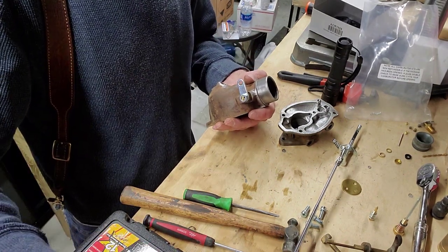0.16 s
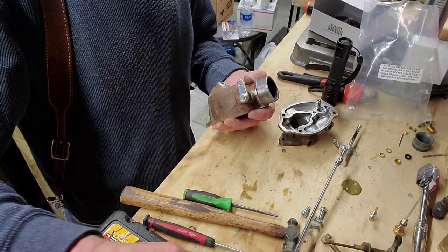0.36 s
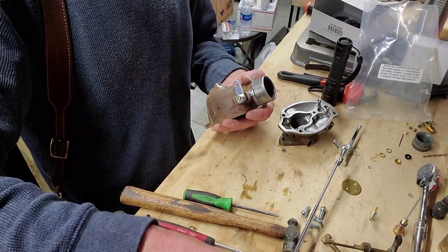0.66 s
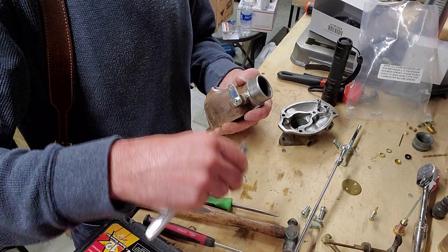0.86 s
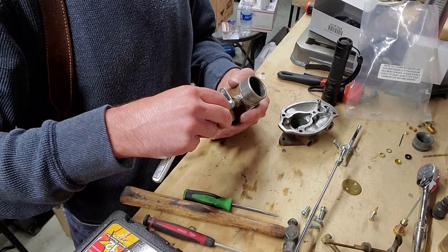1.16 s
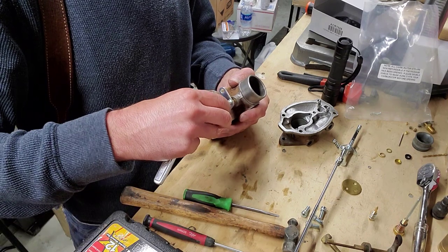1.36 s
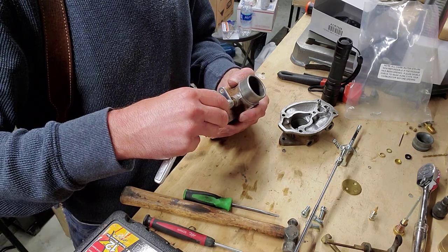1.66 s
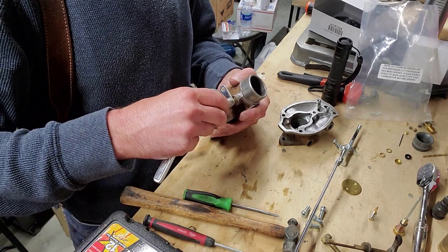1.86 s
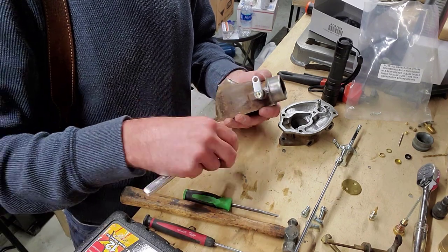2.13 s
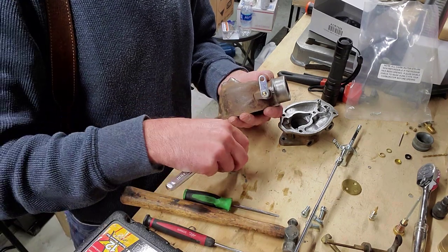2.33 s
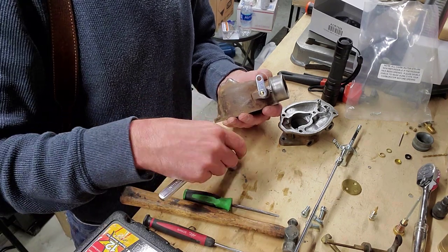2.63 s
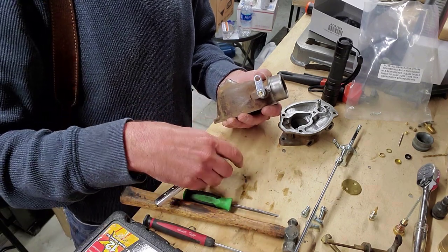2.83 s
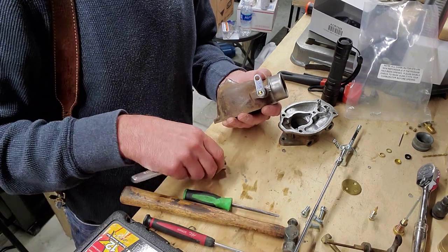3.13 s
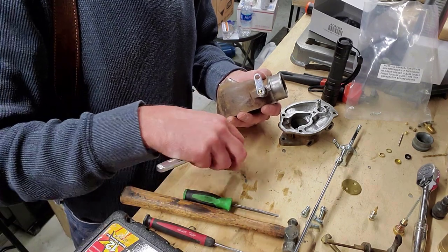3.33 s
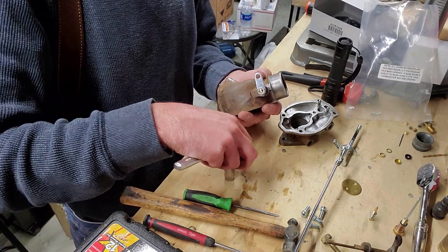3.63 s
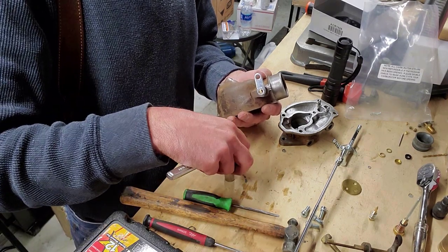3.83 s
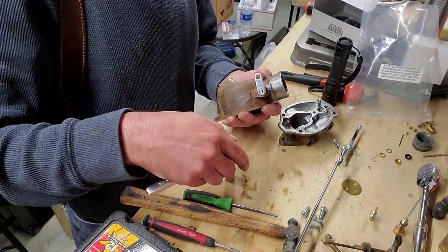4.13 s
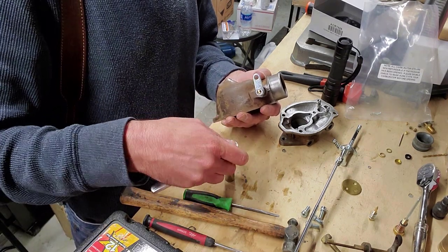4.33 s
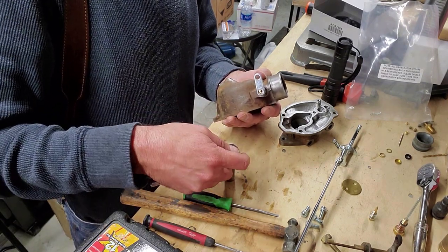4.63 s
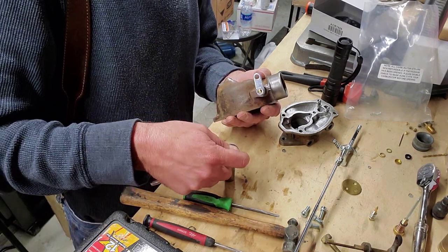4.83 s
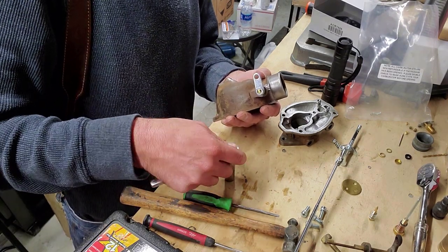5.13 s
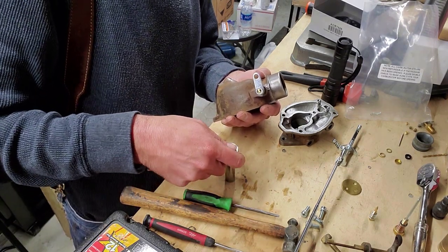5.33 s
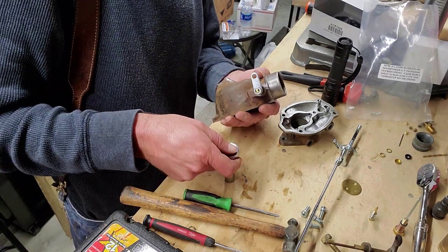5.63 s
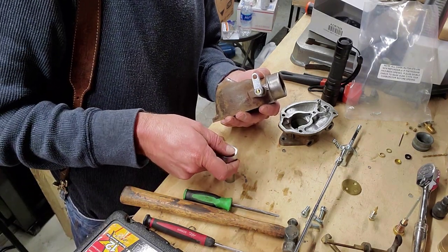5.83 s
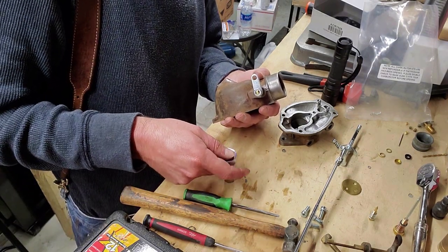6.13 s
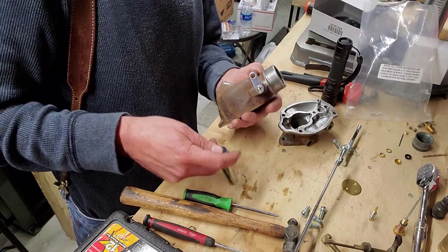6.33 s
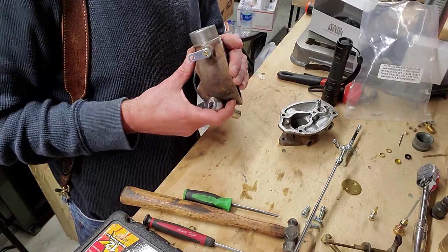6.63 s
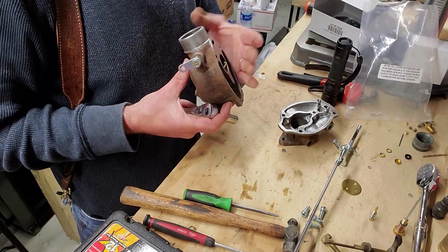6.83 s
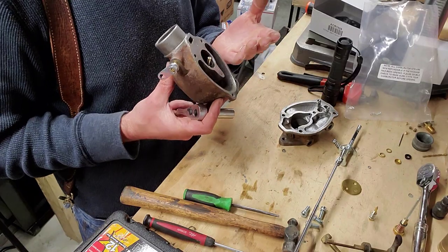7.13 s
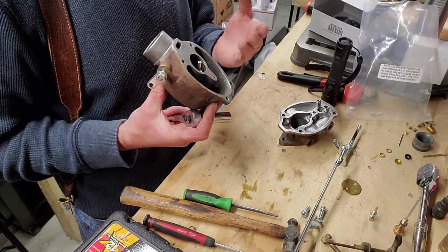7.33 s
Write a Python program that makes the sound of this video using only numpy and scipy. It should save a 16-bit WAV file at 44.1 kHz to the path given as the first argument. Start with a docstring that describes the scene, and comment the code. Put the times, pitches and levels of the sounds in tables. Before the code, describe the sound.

In a small workshop, tools land on a wooden bench with loud, cracking double knocks, then a spanner chatters brightly on a metal part. More wooden thuds and faint ticks follow, quieter in the middle, until a steel piece is set down hard with a short ring and a hollow casting is tapped. A fan hums steadily; the close microphone's level dips after loud knocks and creeps back.

```python
"""A small workshop: a carburettor is worked on by hand at a wooden bench.
Knocks and bumps sound on the bench top: noise bursts through the board's resonances, with cracks and snaps.
A spanner clinks on a nut and taps the casting, and a steel piece is set down: decaying sines with clicks.
Tiny high ticks are narrow bands of noise; a fan hums behind, as coloured noise and sines.
The recorder's gain ducks after loud knocks and creeps back up."""
import sys
import numpy as np
from scipy import signal
from scipy.fft import rfft, irfft
from scipy.io import wavfile
from scipy.ndimage import uniform_filter1d

SR = 44100
rng = np.random.default_rng(int(sys.argv[2]) if len(sys.argv) > 2 else 0)


def store_pcm(level_fs):
    """Save levels as 16-bit WAV."""
    pcm = np.round(np.clip(level_fs, -1, 1) * 32767).astype(np.int16)
    wavfile.write(sys.argv[1], SR, np.atleast_2d(pcm).T)


N = 329427   # length in samples
HIT = np.arange(SR // 3) / SR   # time since a contact, s

# knocks and bumps on the bench: tools landing and, at 1.2 s, a low nudge of a hand:
# t/s, thud level/dB, lower corner f/Hz, upper corner f/Hz, hard crack level/dB, room level/dB,
# delay of the second contact t/s, level of the second contact against the first/dB
BENCH_BLOWS = [(0.1547, -4.5, 210, 1500, -24.5, -5.5, 0.04, -7.5),
               (.313, -7.5, 90, 1470, -1.5, -8.5, 0.044, 0.5), (.506, -27, 110, 1010, -35, -8.5, .006, 7.5),
               (.648, -26.5, 400, 1400, -43.5, -11.5, .012, -11), (1.2, -51, 30, 99, -85, -6, 0.024, 4.5),
               (2.3279, -11.5, 1100, 930, -41, -13, 0.0042, -9.5),
               (2.7839, -14, 290, 1720, -6.5, -6.5, .018, 0.5), (2.845, -9, 262, 1670, -6, -10, 0.031, -3),
               (3.47, -24.5, 500, 910, -54, -14, .012, -7.5),
               (4.6612, -26, 200, 1080, -42.5, -11, .0354, -4.5),
               (4.907, -40.5, 400, 1210, -48, -14, 0.0054, -4), (5.576, -37, 408, 1120, -49, -8, .01, -12),
               (5.752, -23, 380, 1260, -46, -8, 0.012, 2), (5.9976, -5, 110, 1700, -23, -12, .0074, -5.5)]


def from_db(db):
    """Decibels to gain."""
    return 10 ** (np.asarray(db) / 20)


def at_hz(points, hz):
    """Read a table along log frequency."""
    f, value = np.transpose(points)
    return np.interp(np.log(np.maximum(hz, 1)), np.log(f), value)


def unit(x):
    """Scale to energy 1."""
    return x / np.sqrt(np.sum(x ** 2) + 1e-20)


def at_level(x, db):
    """Give a blow the energy of 10 ms at this level."""
    return unit(x) * from_db(db) * np.sqrt(SR / 100)


def dying(t, t60):
    """Exponential decay, down 60 dB after t60 seconds."""
    return np.exp(-np.log(1000) * t / t60)


def add(track, s, sound):
    """Mix a sound in at time s."""
    start = int(s * SR)
    track[start:start + len(sound)] += sound[:N - start]


def colour(x, spectrum):
    """Causal (minimum-phase) filter with the given spectrum."""
    size = 4096
    gain = from_db(at_hz(spectrum, np.fft.rfftfreq(size, 1 / SR)))
    # folding the cepstrum onto positive time makes the filter minimum-phase
    cepstrum = irfft(np.log(gain))
    cepstrum[1:size // 2] *= 2
    cepstrum[size // 2 + 1:] = 0
    response = irfft(np.exp(rfft(cepstrum)))
    return signal.fftconvolve(x, response)[:len(x)]


def contact(scatter_db, t60):
    """One sharp impulse, followed by dense scatter from everything near it; broadly flat in spectrum."""
    scatter = unit(rng.standard_normal(len(HIT)) * dying(HIT, t60))
    burst = from_db(scatter_db) * scatter
    burst[0] += 1
    spectrum = rfft(burst, 2 * len(HIT))
    broad = np.sqrt(uniform_filter1d(np.abs(spectrum) ** 2, size=161))
    return irfft(spectrum / broad)[:len(HIT)]


def fan():
    """Steady rush of air, as coloured noise, with the hum of the motor, as sines."""
    # rush of air: f/Hz, relative level per Hz/dB
    air_spectrum = [(25, -35.5), (60, -5.5), (110, -12), (165, -16), (250, 1), (420, -7.5), (540, 0),
                    (1000, -8), (2200, -13.5), (2900, -21), (4700, -24), (6700, -33.5), (7600, -47),
                    (15000, -50)]
    # motor hum: f/Hz, level/dB
    hum_tones = [(126.5, -59), (252, -61.5)]
    air_db = -47.5
    air = unit(colour(rng.standard_normal(N), air_spectrum)) * np.sqrt(N) * from_db(air_db)
    t = np.arange(N) / SR
    hum = np.zeros(N)
    for hz, db in hum_tones:
        hum += np.sqrt(2) * from_db(db) * np.sin(2 * np.pi * (hz * t + rng.random()))
    return air + hum


def ticks():
    """Tiny high contacts sound in one quickly damped band."""
    # tiny high ticks: small parts shifting, and the bright edge of the knock at 4.66 s:
    # t/s, level/dB, pitch f/Hz
    tiny_contacts = [(.055, -49, 5040), (.111, -54, 5130), (3.193, -33, 4600), (3.719, -51.5, 4150),
                     (4.662, -44.5, 5230), (4.697, -43.5, 4230), (5.7634, -43, 5450), (6.281, -54.5, 6200),
                     (6.3, -50, 6000)]
    half = 0.25 / 2   # half the bandwidth, as a share of the pitch
    out = np.zeros(N)
    for s, db, hz in tiny_contacts:
        band = signal.butter(2, [hz * (1 - half), hz * (1 + half)], "band", fs=SR, output="sos")
        tick = signal.sosfilt(band, contact(scatter_db=0.5, t60=0.055))
        add(out, s, at_level(tick, db))
    return out


def bench_contacts():
    """Each blow makes three contacts: a landing tool's one end, the rock on its shaft, its other end.

    The low nudge of a hand goes through the same three steps."""
    rock_loss_db = 7.5   # the middle contact, halfway, lies this far below the first crack
    duller_db = 11       # the last contact has less crack
    for s, thud_db, low_hz, high_hz, crack_db, room_db, after_s, second_db in BENCH_BLOWS:
        rock_db = crack_db - rock_loss_db   # thud and crack alike
        second_crack_db = crack_db + second_db - duller_db
        yield s, thud_db, low_hz, high_hz, crack_db, room_db
        yield s + after_s / 2, rock_db, low_hz, high_hz, rock_db, room_db
        yield s + after_s, thud_db + second_db, low_hz, high_hz, second_crack_db, room_db


def bench_top(x):
    """The board's resonances stand out of its dense response, one peak filter after another."""
    # resonances of the bench top: f/Hz, width f/Hz, level over what enters the filter/dB
    resonances = [(227.4, 22.5, 11), (324.6, 53, 5.5), (453, 46, 3), (552.6, 54, 3.5), (632, 64, 6),
                  (774, 122, -1), (859, 63, -1.5), (947, 57, 3), (1146, 68, 1), (1360, 45, -1.5),
                  (1490, 44, -2), (1560, 36, -15), (1697, 98, 3), (2400, 150, -9)]
    for hz, width, db in resonances:
        r, w = np.exp(-np.pi * width / SR), 2 * np.pi * hz / SR
        peak = signal.lfilter([(1 - r * r) / 2, 0, (r * r - 1) / 2], [1, -2 * r * np.cos(w), r * r], x)
        x = x + from_db(db) * peak
    return x


def knocks(scatter_over_room_db=11.0):
    """A thud of the board, narrowed by the weight and softness of the blow, plus a crack where steel hits hard."""
    # thud of the board: f/Hz, relative level per Hz/dB
    thud_spectrum = [(30, -48), (70, 6), (130, 1.5), (170, -5.5), (215, -4), (400, 0.5), (800, 1.5),
                     (2000, 2), (16000, -40)]
    # crack of hard steel: f/Hz, relative level per Hz/dB
    crack_spectrum = [(100, -25), (250, -34), (400, -9), (1000, -2.5), (1700, 6.5), (2100, 6), (2500, 3.5),
                      (3200, -0.5), (4000, -2), (5500, -10.5), (8000, -25.5), (11000, -46), (16000, -46)]
    direct, to_room = np.zeros(N), np.zeros(N)
    for s, thud_db, low_hz, high_hz, crack_db, room_db in bench_contacts():
        light = signal.butter(1, low_hz, "high", fs=SR, output="sos")
        soft = signal.butter(6, high_hz, fs=SR, output="sos")
        # a blow that fills the room also shakes more of the clutter on the bench
        blow = contact(scatter_db=room_db + scatter_over_room_db, t60=0.085)
        thud = signal.sosfilt(np.vstack([light, soft]), colour(blow, thud_spectrum))
        thud = bench_top(thud)
        crack = colour(contact(scatter_db=16, t60=0.11), crack_spectrum)
        add(direct, s, at_level(thud, thud_db) + at_level(bench_top(crack), crack_db))
        # the crack reaches the room straight from the steel, the thud by way of the board
        add(to_room, s, at_level(thud, thud_db + room_db) + at_level(crack, crack_db + room_db))
    return direct, to_room


def snaps():
    """The first touch of a hard blow is a short, bright snap of steel; soft blows have hardly any."""
    snap_db, steepness = -26.5, 1.6   # level with a 0 dB crack, dB gained per dB of crack
    band = signal.butter(2, [4500, 10500], "band", fs=SR, output="sos")
    out = np.zeros(N)
    for s, _, _, _, crack_db, *_ in BENCH_BLOWS:
        snap = signal.sosfilt(band, contact(scatter_db=10.5, t60=0.0053))
        add(out, s, at_level(snap, snap_db + steepness * crack_db))
    return out


def workshop(x, build_s=0.011):
    """Diffuse reverberation: noise that builds up quickly and dies at its own rate in each band."""
    # reverberation time: f/Hz, t60/s
    room_decay = [(100, 0.91), (450, 0.42), (1200, 0.48), (3000, 0.51), (6000, 0.39), (12000, .25)]
    t, tail = np.arange(SR) / SR, 0
    edges = np.geomspace(40, 18000, 10)
    for low, high in zip(edges, edges[1:]):
        band_pass = signal.butter(2, [low, high], "band", fs=SR, output="sos")
        band = signal.sosfilt(band_pass, rng.standard_normal(SR))
        tail = tail + band * dying(t, at_hz(room_decay, np.sqrt(low * high)))
    build_up = 1 - np.exp(-t / build_s)
    return signal.fftconvolve(x, unit(tail * build_up))[:N]


def struck_metal(blows, modes, vary_db, click_t60, click_hz):
    """Each touch clicks and rings every mode with a strength of its own; its tilt favours high or low modes."""
    # click: f/Hz, relative level per Hz/dB
    click_spectrum = [(200, -25), (900, 2), (3000, 0), (6000, -3.5), (9000, -9), (12000, -9), (16000, -14)]
    out = np.zeros(N)
    hz, mode_db, t60 = np.transpose(modes)[:, :, None]
    hardness = signal.butter(2, click_hz, fs=SR, output="sos")
    no_bass = signal.butter(2, 180, "high", fs=SR, output="sos")   # the rings carry no deep bass
    for s, ring_db, click_db, tilt_db in blows:
        strength = from_db(mode_db + tilt_db * np.log2(hz) + vary_db * rng.standard_normal(hz.shape))
        sign = rng.choice([-1, 1], hz.shape)
        partials = sign * strength * np.sin(2 * np.pi * hz * HIT) * dying(HIT, t60)
        ring = signal.sosfilt(no_bass, np.sum(partials, axis=0))
        click = colour(contact(scatter_db=27, t60=click_t60), click_spectrum)
        click = signal.sosfilt(hardness, click)
        add(out, s, at_level(ring, ring_db) + at_level(click, click_db))
    return out


def chatter(blows, count=3):
    """Each touch becomes a quick run of rebounds, weaker and duller each time."""
    gap_s, loss_db, duller_db_per_octave = .007, 8.5, 4   # per rebound
    run = []
    for s, ring_db, click_db, tilt_db in blows:
        for k in range(count):
            loss = k * loss_db
            tilt = tilt_db - k * duller_db_per_octave
            run.append((s + k * gap_s, ring_db - loss, click_db - loss, tilt))
    return run


def spanner_clinks():
    """The spanner touches steel and chatters, ringing in its own modes."""
    # touches: t/s, ring level/dB, click level/dB, tilt of the ring/dB per octave
    touches = [(1.006, -23, -29, -1), (1.223, -33.5, -40.5, -2.5), (1.437, -49.5, -57, 0),
               (1.711, -46.5, -56, -4), (1.7465, -43.5, -62, -6.5), (1.7765, -49, -55, -6),
               (1.918, -51.5, -82, -1.5)]
    # modes of the spanner: f/Hz, relative level/dB, t60/s
    modes = [(1480, -3, 0.039), (1890, -6.5, 0.045), (2290, -8, .05), (2840, -14, 0.053),
             (3157, -2.5, .075), (4590, 1.5, 0.041), (5040, -12, 0.042), (5790, 8, 0.024),
             (5970, -0.5, 0.051), (6300, -1.5, 0.055), (7350, 2, 0.048), (8990, -14, 0.11),
             (11500, -33, .05)]
    return struck_metal(chatter(touches), modes, vary_db=3.0, click_t60=0.074, click_hz=10000)


def steel_set_down():
    """A steel piece is set down hard and rings with the board under it."""
    # contacts: t/s, ring level/dB, click level/dB, tilt of the ring/dB per octave
    touches = [(5.763, -44, -44, 3.5), (5.9975, -11.5, -20.5, 0.3)]
    # modes of the piece and the board: f/Hz, relative level/dB, t60/s
    modes = [(215, -20, 0.25), (236.5, 3, 0.11), (328, -10.5, 0.41), (413.6, -5.5, 0.42), (459, -3, 0.3),
             (645, -1, 0.13), (719, 6.5, 0.095), (970, -6, 0.035), (1520, -23, 0.035), (1757, 3, 0.037),
             (3570, -19, 0.035), (5960, -20, .06), (7250, -11, .035), (8870, -11, 0.028),
             (11900, -18, 0.08)]
    return struck_metal(touches, modes, vary_db=1.2, click_t60=0.1, click_hz=14000)


def casting_taps():
    """The spanner taps the hand-held casting, which rings in short, damped modes."""
    # taps: t/s, ring level/dB, click level/dB, tilt of the ring/dB per octave
    touches = [(6.6405, -14.5, -29, -1.5), (6.687, -28.5, -40, -10)]
    # modes of the casting: f/Hz, relative level/dB, t60/s
    modes = [(1050, -19, 0.017), (2950, -0.5, 0.05), (3210, -9, 0.026), (4310, -16.5, 0.049),
             (4590, -15, 0.063), (5420, -15, .035), (5660, -17, 0.04), (5750, -13, 0.045),
             (6050, -19, 0.055), (8950, -32.5, 0.036), (11860, -36, .05)]
    return struck_metal(touches, modes, vary_db=0.4, click_t60=0.1, click_hz=6200)


def scene():
    """Bench, metal parts, room and fan at one microphone."""
    bench, to_room = knocks()
    small_contacts = ticks() + spanner_clinks()
    piece = steel_set_down()
    casting = casting_taps()
    metal_to_room = from_db(-26.5) * small_contacts + from_db(-16) * piece + from_db(-28.5) * casting
    room = workshop(from_db(-6.5) * to_room + metal_to_room)
    return (fan() + bench + snaps() + small_contacts + piece + casting + room)[None]


def gain_control(x, threshold_db=-28, depth_db=11.5, attack_s=0.13, release_db_per_s=5.0):
    """While the sound is loud the gain sinks towards its limit; afterwards it climbs back steadily."""
    size = 256   # samples per gain step
    step = size / SR
    power = np.abs(uniform_filter1d(x ** 2, 2 * size)[::size])
    level = 10 * np.log10(power + 1e-12)
    # loudness goes from 0 to 1 over 20 dB around the threshold
    loudness = np.clip((level - threshold_db) / 20 + .5, 0, 1)
    cut, cuts = 0, []
    for loud in loudness:
        sink = loud * (depth_db - cut) / attack_s
        climb = (1 - loud) * release_db_per_s
        cut = max(0, cut + step * (sink - climb))
        cuts.append(cut)
    cut_db = np.interp(np.arange(N) / size, np.arange(len(cuts)), cuts)
    return x * from_db(-cut_db)


def record(dry, low_cut_hz=40, top_cut_hz=15900):
    """Gain control, peaks rounded just under full scale, a rumble filter and a steep top cut."""
    ceiling = .86   # where the rounding levels off, share of full scale
    level = gain_control(dry[0])
    rounded = level / (1 + (level / ceiling) ** 4) ** .25
    no_rumble = signal.sosfilt(signal.butter(2, low_cut_hz, "high", fs=SR, output="sos"), rounded)
    return signal.sosfilt(signal.ellip(10, .1, 80, top_cut_hz, fs=SR, output="sos"), no_rumble)[None]


dry = scene()
out = record(dry)
store_pcm(out)
```